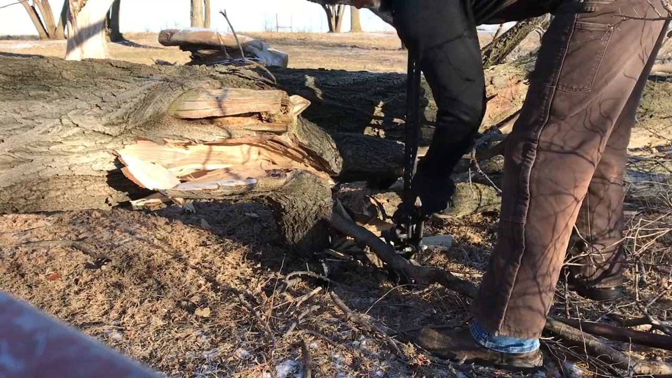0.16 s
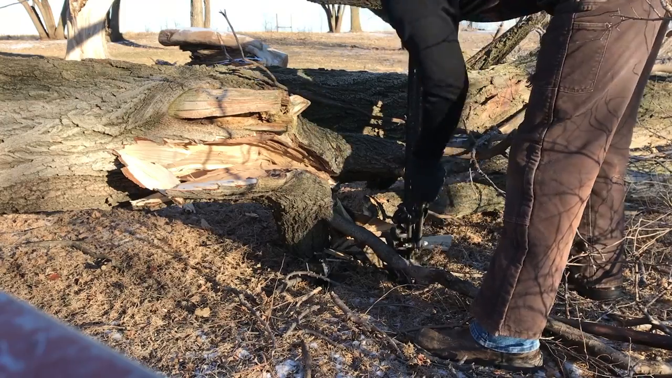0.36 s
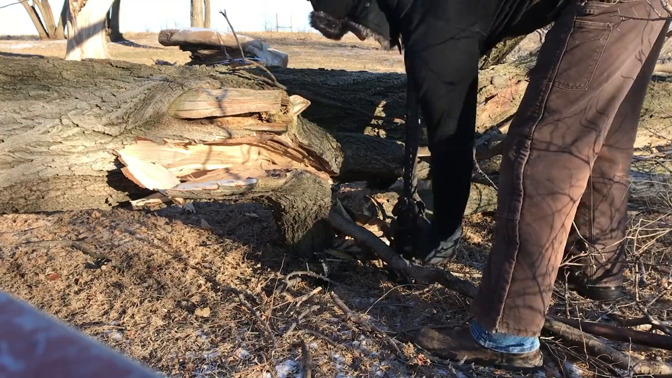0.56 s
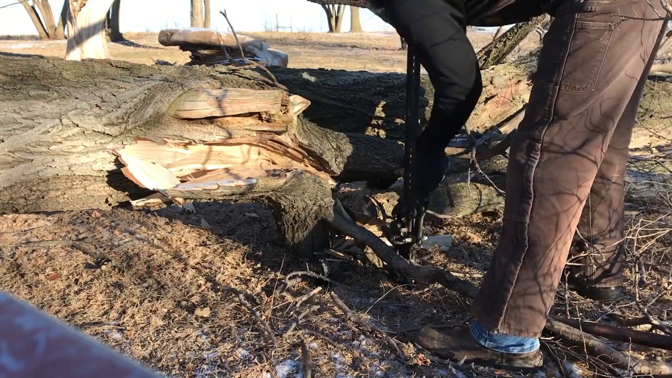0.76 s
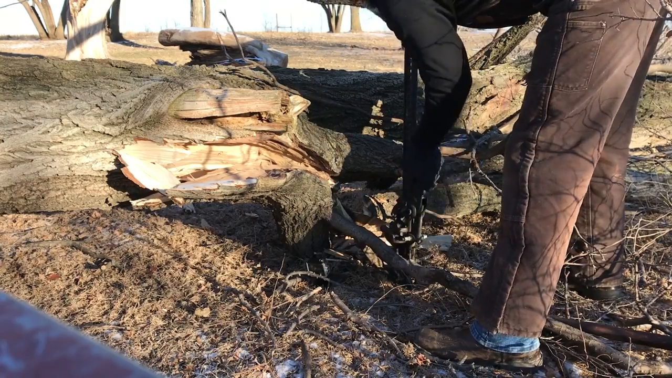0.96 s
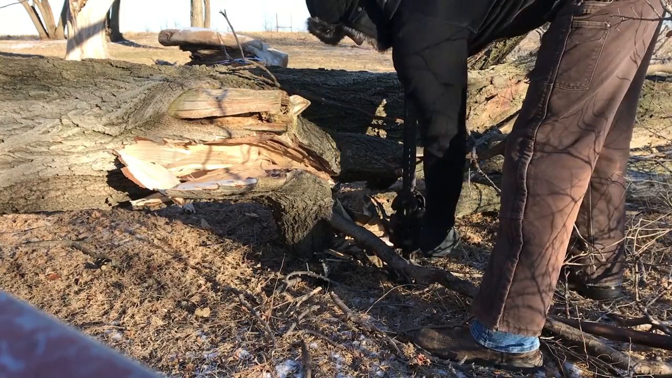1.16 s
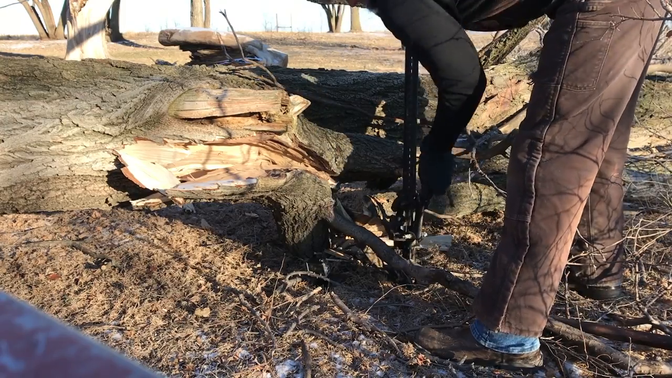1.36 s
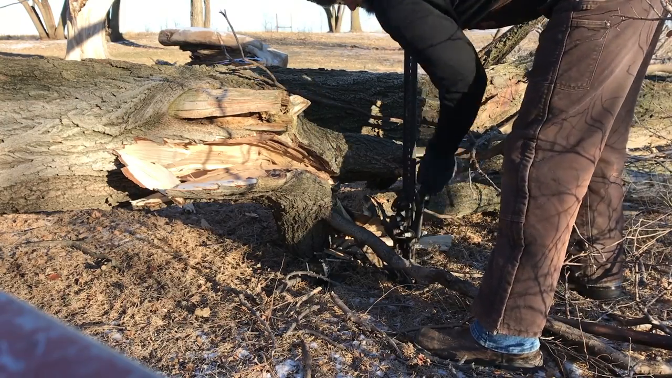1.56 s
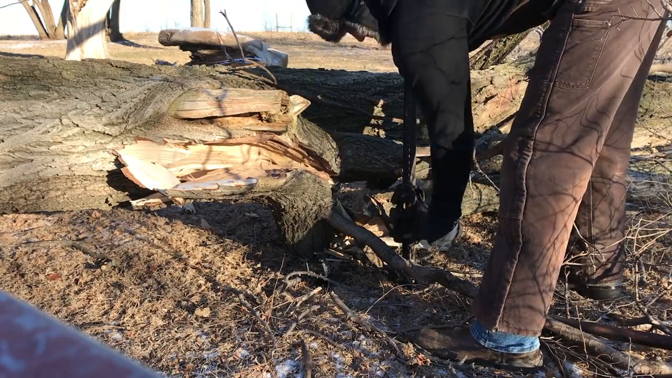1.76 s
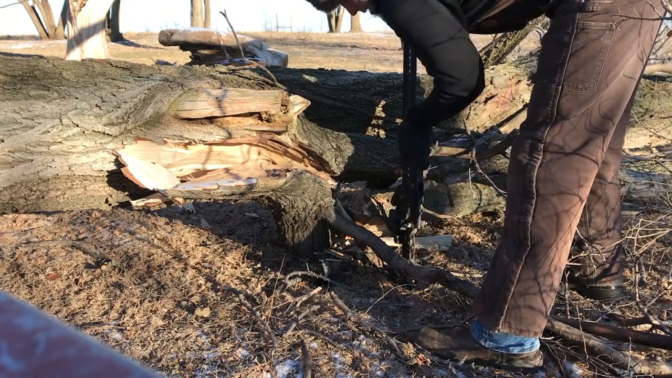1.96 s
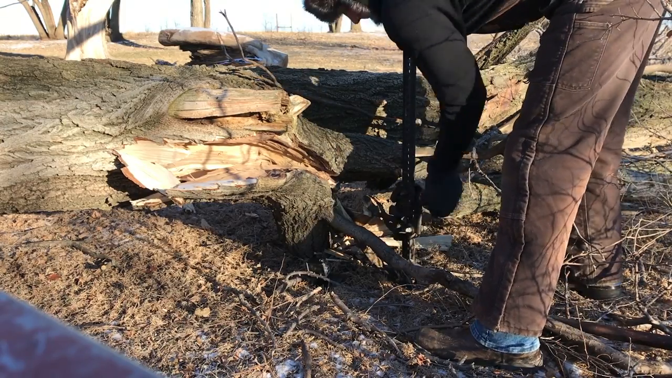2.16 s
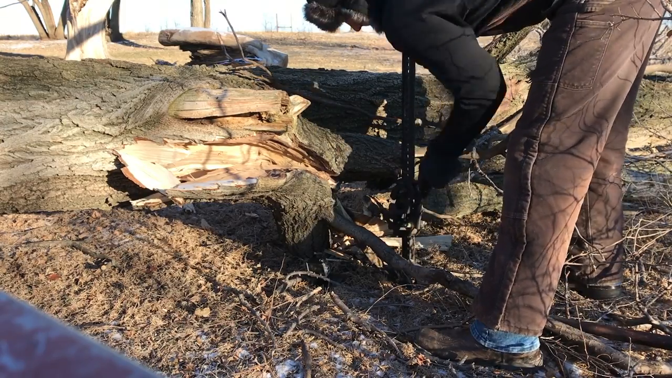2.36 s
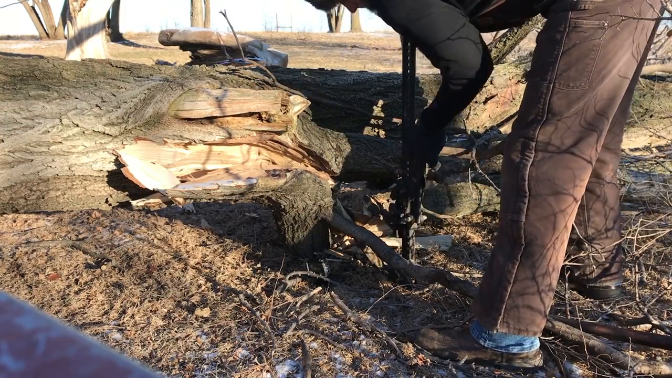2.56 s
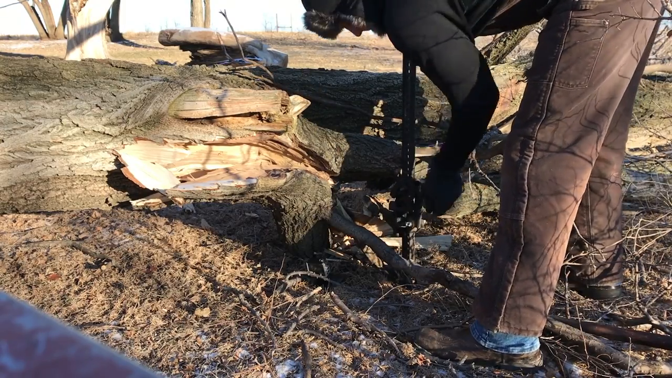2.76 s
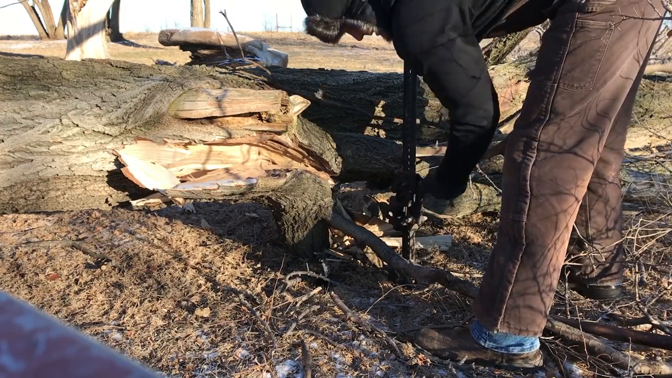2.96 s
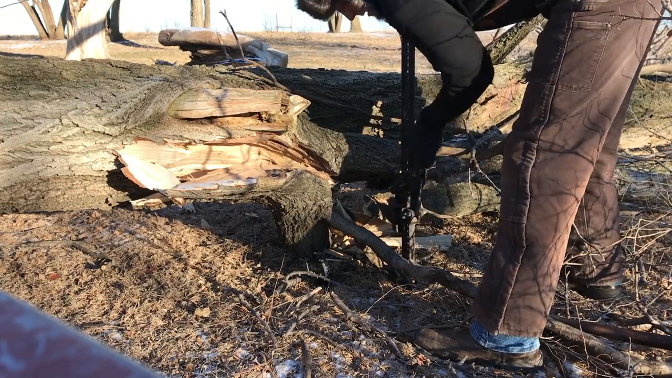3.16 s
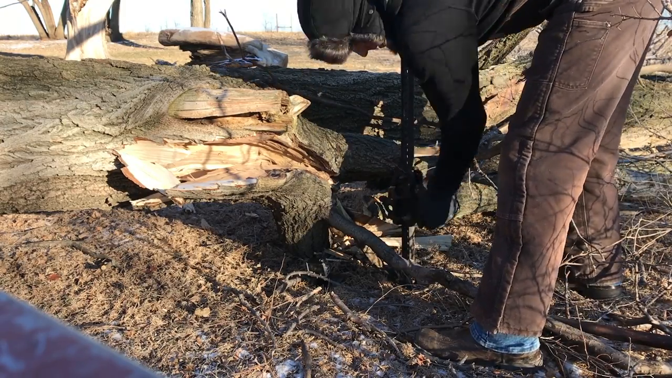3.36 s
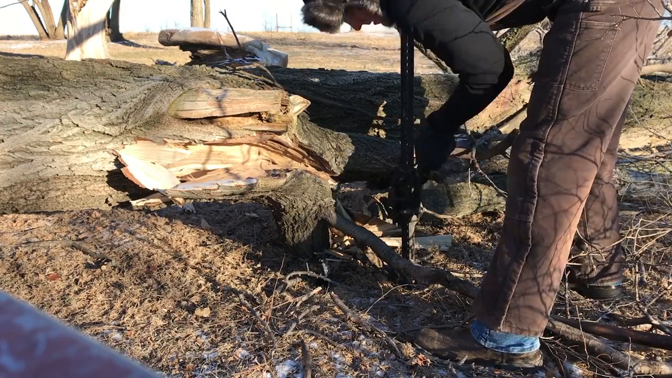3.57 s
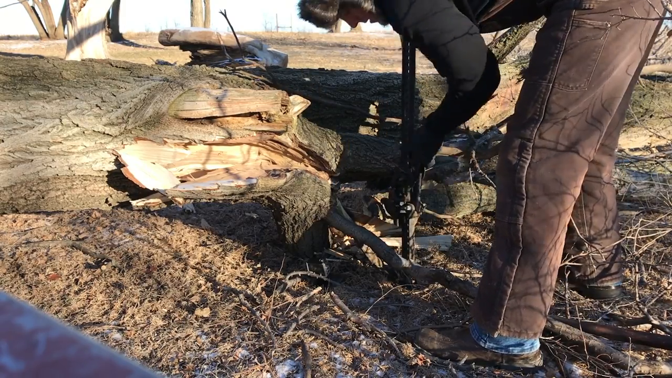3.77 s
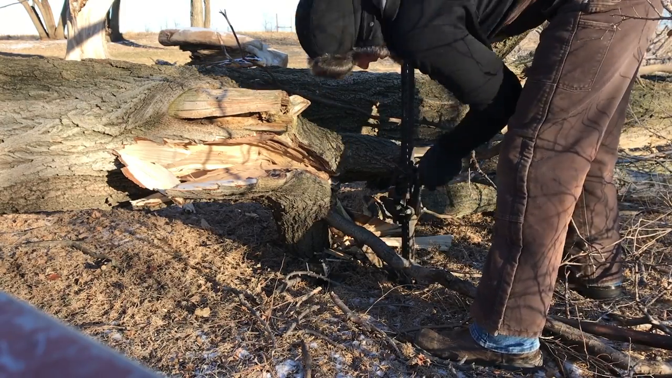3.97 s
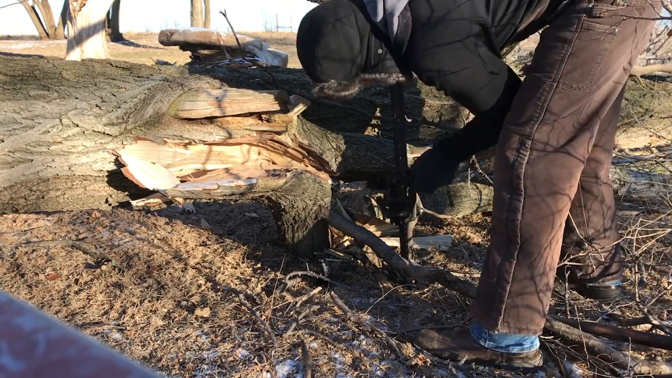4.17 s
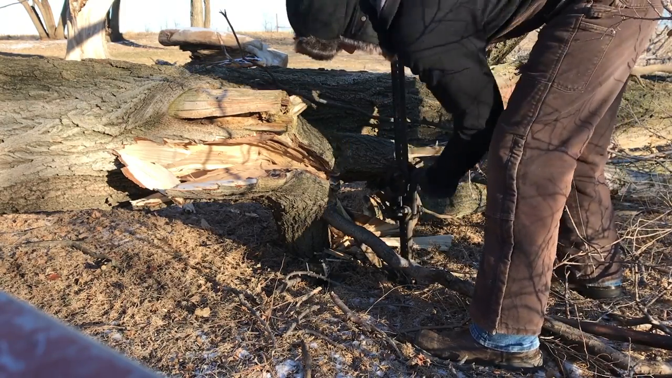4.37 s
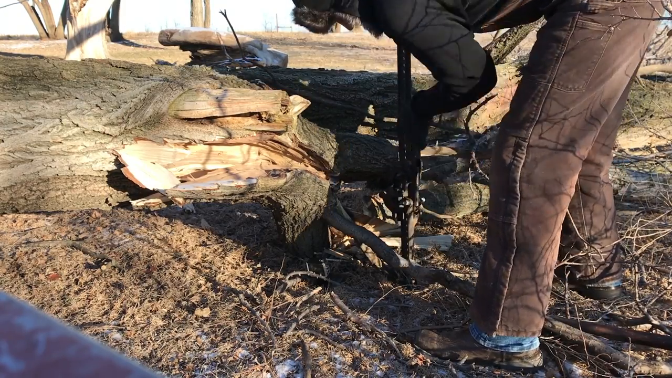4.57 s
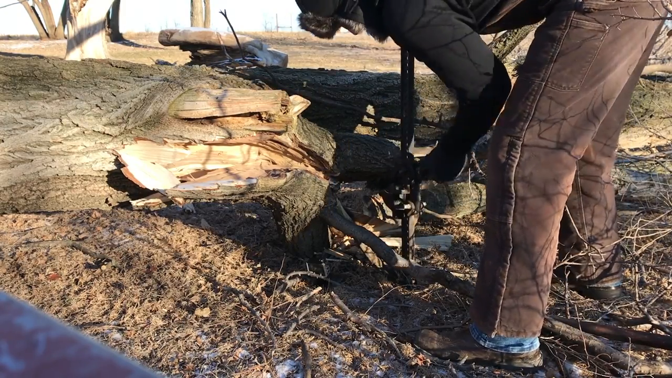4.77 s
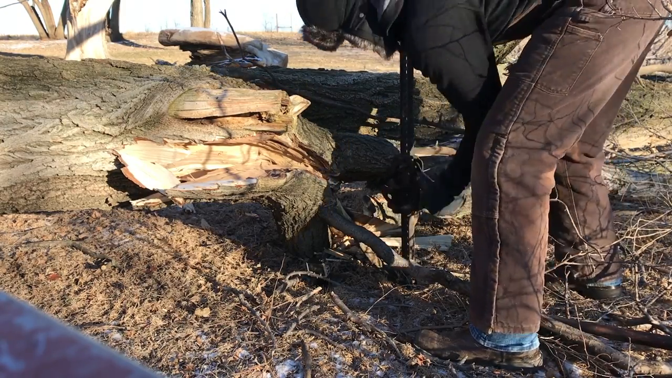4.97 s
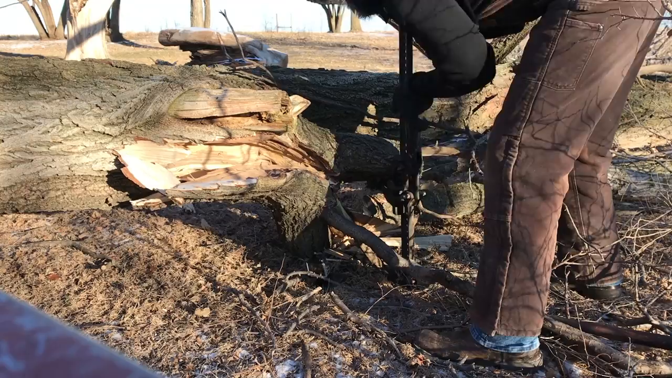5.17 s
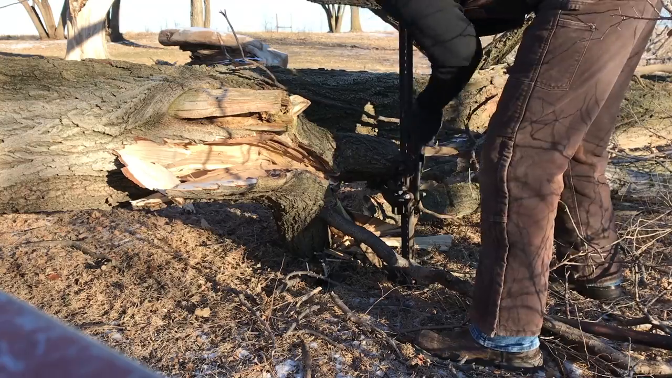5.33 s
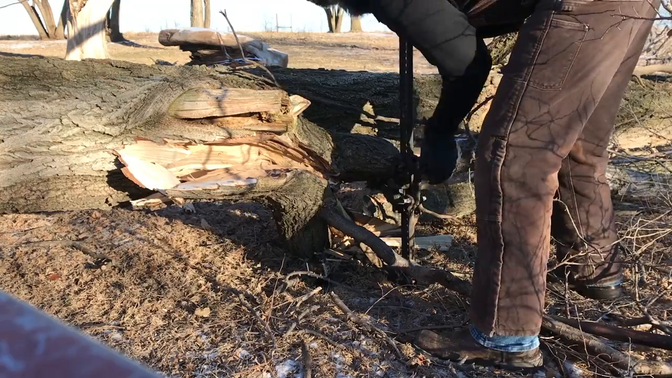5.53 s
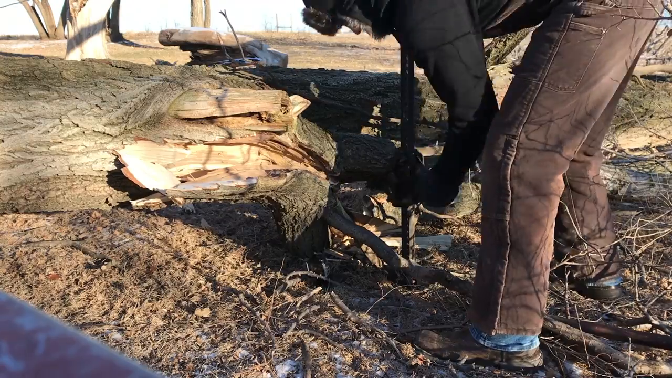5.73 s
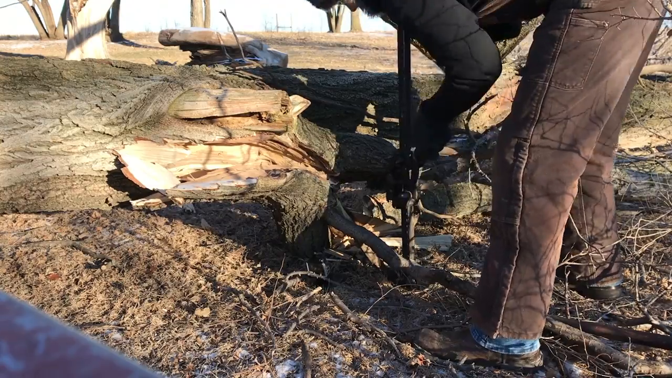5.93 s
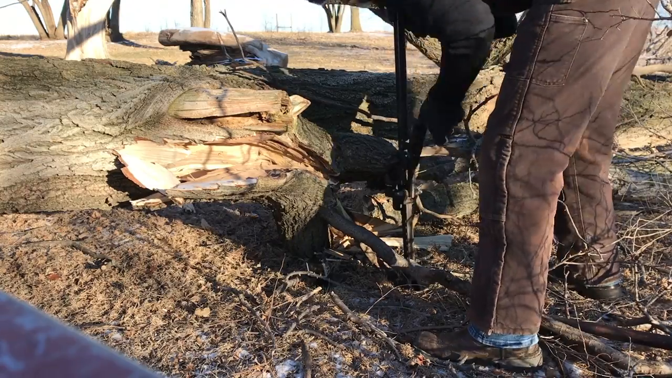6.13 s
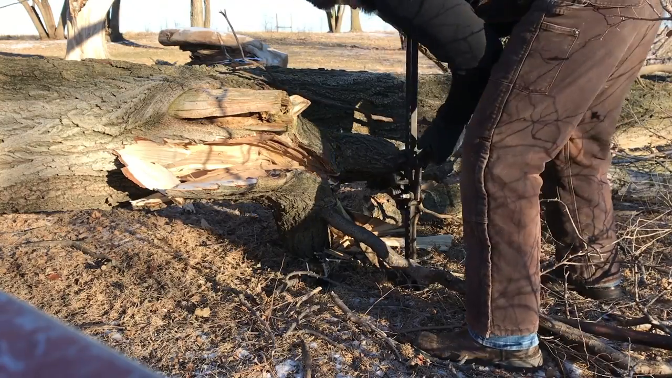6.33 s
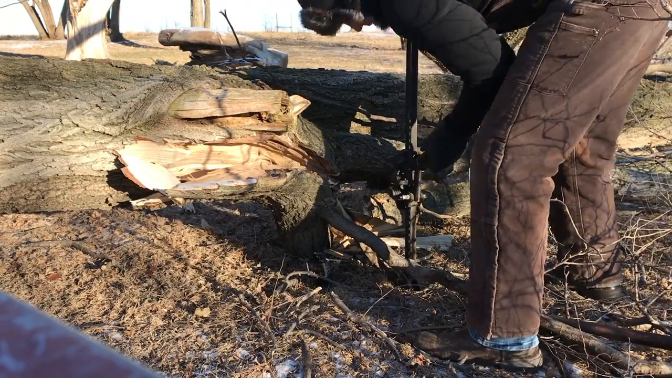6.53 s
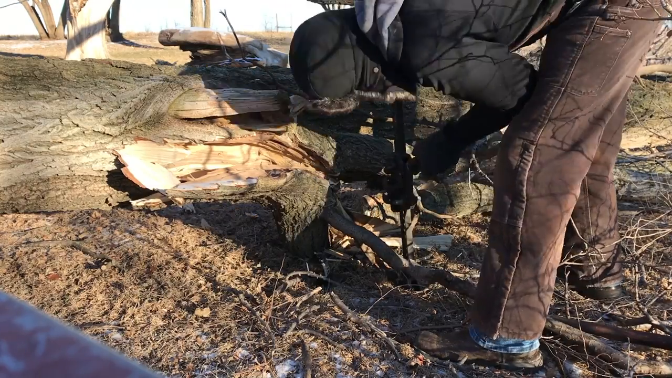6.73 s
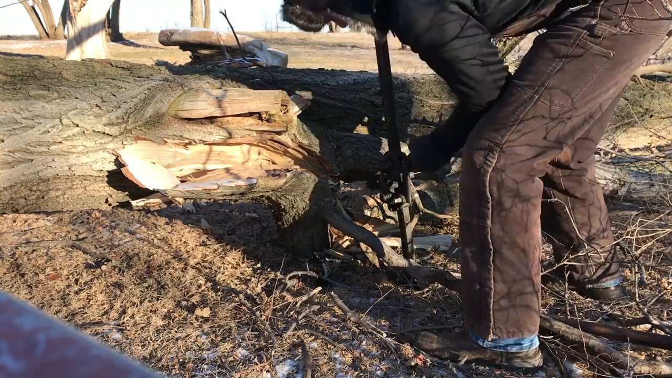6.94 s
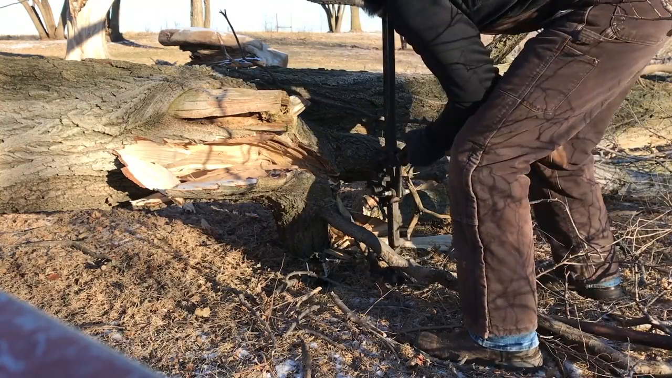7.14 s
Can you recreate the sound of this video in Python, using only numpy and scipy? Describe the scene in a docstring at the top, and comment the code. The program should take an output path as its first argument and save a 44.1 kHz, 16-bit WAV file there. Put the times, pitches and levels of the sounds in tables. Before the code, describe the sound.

Outdoors among trees, sharp steel clicks and clacks come from a nearby jack being worked by hand, several a second, often doubled by small rebounds. The carriage rasps lightly along the bar between blows. Near the end the blows stop for almost a second, leaving faint sliding, before one more scrape and a short cluster of clacks. A far engine hums very softly under the quiet open air.

```python
"""A steel lifting jack is pumped by hand beside a felled trunk; a far engine hums under the woodland hush.
From the start, pins and handle strike and rebound on the bar, exciting damped modes that the ground
and trees scatter back; between blows the carriage slides and scrapes by friction. Around 1.2 s the
undamped bar rings on faintly. After 6.3 s the blows pause and the sliding goes on, until a last
scrape and cluster of clacks come just after 7 s."""
import sys
import numpy as np
from scipy import signal
from scipy.fft import rfft, irfft
from scipy.io import wavfile
from scipy.ndimage import uniform_filter1d

SR = 44100
rng = np.random.default_rng(int(sys.argv[2]) if len(sys.argv) > 2 else 0)


def pcm_store(signal):
    """Save signal as 16-bit PCM."""
    levels = np.round(np.clip(np.atleast_2d(signal), -1, 1) * 32767)
    wavfile.write(sys.argv[1], SR, levels.astype(np.int16).T)


N = 317520

# spectra of the woodland air, the rubbing, and a faint high hiss that swells and drops out between blows: f/Hz,
# relative density/dB
HUSH_SPECTRUM = [(18, -50), (30, -24.5), (54, -17), (86, -10), (112, -4), (185, -5.5), (450, -23.5),
                 (800, -26.5), (1700, -26), (3000, -32.5), (4600, -39.5), (6700, -41), (9000, -57),
                 (16500, -68.5)]
RUB_SPECTRUM = [(800, -29.5), (1500, -8.5), (2300, 0.5), (3300, -3), (4600, -9), (6800, 5.5), (8200, -4),
                (10000, -28.5), (16000, -38)]
HISS_SPECTRUM = [(5000, -34), (8500, -6), (11000, -4), (16000, -9)]
# engine tones: f/Hz, bandwidth/Hz, level/dB
ENGINE_TONES = [(127.6, 6.8, -65), (181.9, 7.4, -63), (574, 5.2, -80.5)]
# steady sliding of steel on steel, and the faint high hiss: t/s, rub level/dB, hiss level/dB
SLIDING = [(0.0, -61, -76), (.2, -73, -84), (.45, -63, -77), (.75, -66, -75), (0.999, -72, -92),
           (1.3, -80, -88), (1.5, -65, -78.5), (2.1, -65.5, -79.5), (2.9, -69, -80.5), (3.35, -64.5, -74),
           (3.85, -68, -78), (4.11, -73, -87), (4.5, -67, -81), (5.301, -65, -75), (5.699, -71.5, -86),
           (6.001, -80, -85), (6.4, -69.5, -86), (6.8, -69, -82.5), (7.2, -69, -80.5)]
# harder rubs: peak t/s, level/dB, swell time/s
SCRAPE_PEAKS = [(.58, -84, 0.043), (1.24, -63, 0.23), (2.36, -61.5, 0.12), (2.65, -62.5, 0.09),
                (3.78, -60, .06), (4.73, -68.5, 0.053), (5.29, -65.5, 0.084), (5.86, -58.5, 0.076),
                (6.015, -58, 0.016), (6.045, -53.5, 0.028), (6.09, -59.5, 0.13), (6.19, -62, 0.027),
                (7.142, -52, 0.082)]
# scattered tail: f/Hz, level/dB, T60/s
SCATTER_DECAY = [(1000, -37, 0.2), (2300, -57.5, 0.075), (4500, -58.5, 0.31), (6570, -59, .16),
                 (12000, -49, 0.057)]
# modes of the jack: f/Hz, level/dB, T60/s
BAR_MODES = [(1990, -5, .25), (2060, -2, .4), (2570, 2, .5), (2827, -5.5, .25), (3120, -4, 0.3),
             (3620, -8, .4)]  # long ring of the tall bar
THUD_MODES = [(253, 5, 0.039), (447, -1.5, 0.071), (603, -5, 0.049), (875, 2, 0.022), (1060, -5.5, 0.011)]  # base plate on soil
KNOCK_MODES = [(747, -3, 0.034), (1196, 1, 0.011), (1365, 1.5, 0.019)]  # heavy carriage rocking
BODY_MODES = [(1823, -8.5, 0.029), (2000, -6, 0.038), (2154, 2.5, 0.019), (2482, -4.5, 0.015),
              (2888, -1.5, 0.011), (3154, -13, 0.033), (3385, -2.5, 0.0082), (3670, -18, 0.042),
              (3920, 2, 0.0055)]  # bar and carriage
SNAP_MODES = [(2270, -1, 0.0026), (2880, 0, 0.0036), (4060, -1.5, 0.0023), (5200, -8, 0.0035)]  # dry snap of steel on steel
CLACK_MODES = [(4700, -2, 0.0089), (4750, -3, 0.015), (5370, -7, 0.018), (5728, -1, 0.0073),
               (6110, -3, 0.015), (6443, -3, 0.0065), (6847, 0.5, 0.011), (7330, -11, 0.017),
               (7405, 0, 0.01), (7860, -8.5, 0.024), (8344, -4, 0.0085), (9070, -1.5, 0.0082)]
TREBLE_MODES = [(9820, 7.5, 0.0083), (10780, 5.5, 0.011), (10700, -2, 0.0035), (12300, 1, 0.0036),
                (13370, -8.5, .005), (14200, -16.5, .005), (15460, -13, .006)]
PIN_MODES = [(6710, 0, .045)]
# blows that set a free pin singing, and blows that rock the carriage: t/s, energy level/dB in 1 ms
PIN_BLOWS = [(.3537, -19), (.5016, -17.5), (1.5158, -6), (2.0534, -6), (2.439, -25), (2.5883, -33),
             (3.964, -23), (4.474, -17), (5.234, -47), (7.1802, -36.5)]
KNOCK_BLOWS = [(.3537, -41.5), (.5016, -46), (1.5158, -47), (4.6214, -43.5), (5.2466, -46), (7.1739, -37)]
# blows of a pin or the handle: t/s, clack energy level/dB in 1 ms, body level/dB re clack,
# treble level/dB re clack, thud energy level/dB in 1 ms, chatter time/ms
IMPACTS = [(.0031,-16.5,-16,-20,-59.5,0.65),(.032,-17,-13.5,-50,-47,1.9),(0.0813,-53,12,-14,-74,3.2),(.087,-29.5,-4,-24,-70,2.6),
           (.131,-32.5,-13,-28,-70,0.92),(.1335,-40,-7,-17,-70,1.7),(0.1489,-28,1.5,-17,-70,0.66),(0.1527,-19.5,-12.5,-12,-72,.8),(0.1609,-32,-12,-23,-72,2.7),
           (0.2083,-46,10,-26,-70,4.9),(0.35,-48,9,-8,-74,8.6),(.3537,-11.5,-5.5,-25,-69,2.8),(0.41,-42,-22,-13,-67,1.5),(.4175,-39,-15,-14,-74,1.7),
           (.422,-40,.5,-22,-72,6.1),(0.431,-40,-2,-26,-70,1.2),(0.472,-29,-14,-17,-70,3.2),(0.493,-47,3,-14,-70,11),(0.5018,-14,-6.5,-22,-52,0.99),
           (.526,-54.5,10,-20,-70,1.8),(.5825,-58.5,8,-18,-69,1.2),(.6157,-16,-16,-8.5,-68,1.3),(.6412,-21,-7,-25,-45,2.6),(0.6571,-22,-6,-28,-75,2.1),(0.6876,-35.5,9,-28,-68,2.2),
           (.692,-22.5,-4.5,-23,-68,3.3),(.7345,-60,13,-19,-70,1.5),(.7505,-42,8,-32,-70,0.51),(0.754,-39,4,-21,-64,2.2),(.758,-28.5,1.5,-23,-60,5.6),
           (.7672,-53,13,-19,-70,3.8),(0.7847,-32.5,10,-30,-50,2.8),(0.8638,-54.5,6.5,-27,-68,2.3),(0.8955,-27,-4,-31,-44,1.2),(0.9066,-26,-6.5,-14,-62,1.2),(1.031,-60,4,-11,-69,3.8),(1.0497,-52,6,-19,-58,3.3),
           (1.0605,-26.5,-1.5,-46,-62,2.6),(1.1032,-33.5,-5,-14,-70,5.6),(1.1121,-21,-1.5,-26,-41,2.6),(1.125,-35.5,-9,-21,-70,2.9),
           (1.2052,-14.5,-11.5,-15,-70,1.8),(1.2231,-14.5,-10,-29,-43.5,3.1),(1.2364,-20,-4.5,-31,-61,2.2),(1.2791,-18.5,-0.5,-20,-68,3.6),
           (1.3383,-34,4,-39,-76,0.72),(1.3436,-36.5,7,-32,-70,3.1),(1.3527,-16,-2.5,-32,-41.5,3.4),(1.3782,-30.5,8.5,-19,-54,0.57),(1.3835,-43,11,-23,-70,0.89),
           (1.4145,-62,20.5,-22,-70,2.6),(1.5112,-37,-3,-14,-63,2.9),(1.5159,-8.5,-5.5,-14.5,-70,3.95),(1.582,-63,12,-14,-70,1.7),(1.6007,-44,-2,-15,-68,2.6),(1.6513,-38,7.5,-41,-46,3.1),
           (1.664,-32.5,-1,-26,-42,2.6),(1.67,-33,-4,-15,-61,3.7),(1.6777,-17,-2.5,-24,-45,3.9),(1.686,-32,-8,-19,-38.5,2.5),(1.705,-50,11,-22,-50,3.4),
           (1.7707,-12.5,-15,-14.5,-68,0.73),(1.789,-11.5,-13,-41,-45,1.3),(1.8028,-22,-2,-28,-61,2.1),(1.8511,-22,0.5,-17,-43,2.7),
           (1.9147,-30,1.5,-40,-67,0.37),(1.919,-28,.5,-25,-63,3.5),(1.9242,-22,-7.5,-18.5,-41,1.3),(1.927,-34,0,-20,-74,12),(1.9435,-31,8,-23,-50,1.8),
           (2.023,-52.5,9,-16.5,-66,13),(2.0529,-8,-6.5,-25.5,-63,6.2),(2.0727,-41,-5,-13.5,-65,3.1),(2.132,-49.5,-1,-12.5,-72,0.95),(2.1848,-55,11,-14,-76,2.5),(2.196,-31.5,1.5,-30,-73,1.4),
           (2.2047,-25.5,-4.5,-16,-44,9.5),(2.2132,-19,-3.5,-29,-42,3.1),(2.221,-31.5,-6,-19,-67,4),(2.2363,-54.5,7.5,-14,-70,1.7),(2.263,-47.5,-15.5,-15,-70,1.6),(2.2958,-38,-16,-20,-73,2),(2.3017,-15,-15.5,-14,-70,0.4),
           (2.3185,-11.5,-10.5,-41,-46,1.52),(2.334,-26,3.5,-37,-54,2.4),(2.411,-32,-35,-13,-63,0.84),(2.428,-39,11,-17,-61,7.9),(2.4347,-23.5,-7,-20,-61,1.4),
           (2.439,-12.5,-12,-21,-42.5,1.9),(2.4518,-45.5,18,-22,-70,0.84),(2.5885,-7,-10.5,-31.5,-39.5,4.9),(2.622,-61,6,-14,-70,3),(2.641,-53,7,-14,-70,3.5),(2.671,-62,4,-10,-70,1.7),(2.6858,-53,12,-14,-56.5,3.6),(2.704,-50.5,5,-26,-65,14),
           (2.7573,-33,2,-25,-64,3.2),(2.7631,-23.5,-3,-24,-48,4),(2.7664,-26,3,-43,-44,4.4),(2.781,-37,-16,-18,-59,2),(2.8423,-68.5,16,-10,-63,2.3),(2.9249,-14,-18.5,-15.5,-66,1.2),
           (2.9446,-13,-10,-37,-43.5,0.7),(3.0548,-26.5,2,-31,-64.5,4),(3.0579,-26.5,-6,-25,-63,6.8),(3.0742,-15.5,-7.5,-21,-44,0.53),(3.087,-43.5,13,-22,-42,1.6),
           (3.1755,-53,5,-16,-70,1.3),(3.1927,-6,-13,-25.5,-60,3.7),(3.2143,-39,-12,-18.5,-45.5,5.2),(3.2852,-52.5,11,-18,-70,3.2),(3.299,-44,8,-28,-70,4.2),(3.316,-18.5,-3.5,-34,-52.5,3.3),
           (3.3303,-42,1,-25,-42,2.2),(3.3642,-43,-7,-26,-70,1.6),(3.4082,-15.5,-15.5,-9.5,-78,2.4),(3.4344,-12,-11,-47,-38.5,2.3),(3.503,-51.5,9.5,-26,-74,0.92),
           (3.532,-47.5,-12.5,-14,-70,2.2),(3.5456,-39,-9,-16,-59,2.5),(3.554,-24.5,1.5,-38,-53,5.7),(3.5608,-21,-18,-29.5,-42,4.3),(3.5733,-37.5,17.5,-20,-39.5,4.1),(3.723,-41,-6,-24.5,-73,21),
           (3.7358,-5.5,-12,-23,-43,5.3),(3.885,-50.5,10.5,-27,-72.5,2),(3.9337,-38,-3,-17,-50.5,3.7),(3.945,-52,-5,-6,-49,4.9),(3.9526,-31.5,-1.5,-30,-71.5,2),
           (3.9574,-26.5,-7,-24.5,-67.5,2.6),(3.965,-25.5,3,-31,-60,2.1),(3.9745,-33,-3,-30,-54.5,1.6),(3.9811,-31.5,-0.5,-39,-41,1.47),(4.1325,-63.5,11.5,-16.5,-71.5,2.5),(4.1738,-60.5,-11.5,-28.5,-70.5,1.5),(4.311,-45,-3.5,-22,-71.5,10.6),
           (4.3311,-13.5,-15.5,-12.5,-67,1.13),(4.3505,-13.5,-12.5,-56,-50,1.25),(4.3698,-32,-8,-22,-67,.9),(4.3763,-37,-6,-19,-68,1.5),(4.3883,-34.5,-2,-17,-68,2.2),
           (4.3932,-44,5.5,-23,-64,4.5),(4.411,-48,-3,-11,-70,2),(4.4637,-24.5,-1,-23,-57,6.5),(4.475,-21.5,0,-24,-41,2.5),(4.5226,-71.5,28.5,-12,-63,2),(4.6209,-9.5,-8,-24,-59,3.5),
           (4.6717,-44.5,-5,-11,-67,1.5),(4.7588,-18.5,-1.5,-22,-58,6.1),(4.9246,-47.5,-16,-15.5,-58,2.2),(4.9645,-10.5,-27,-14,-70,0.85),(4.9783,-10,-11,-37,-41.5,2),
           (4.9897,-25,-2.5,-18,-47,2.4),(5.0874,-42,-7,-4,-70,3.6),(5.109,-32,-0.5,-35,-74,3.3),(5.116,-33,6,-20,-70,3.6),(5.126,-15.5,-11.5,-41,-40.5,1.6),
           (5.182,-59.5,12,-15,-70,1.4),(5.2072,-48,-15.5,-14,-70,2.4),(5.234,-46,2,-10,-54,10),(5.2469,-6.5,-6,-13.5,-39,5.7),(5.3,-46,-3,-27,-69.5,2),(5.3742,-68,23,-22,-47,1.8),(5.471,-57.5,3,-14,-72,3.4),(5.4887,-32,0,-18,-68,1.5),
           (5.4978,-20,-3,-18.5,-35,4.6),(5.6868,-44.5,-10.5,-11.5,-66.5,2.0),(5.6948,-48,-10,-20.5,-70,11.5),(5.7175,-16.5,-16,-5,-53,0.7),(5.732,-8,-15,-39,-47,0.57),
           (5.7361,-23.5,-0.5,-22.5,-39.5,2.2),(5.8381,-42,-9,-21,-70,0.95),(5.8413,-35,-15,-12,-49,2),(5.846,-42,6.5,-15,-70,6.1),(5.8536,-40,-13,-23,-52,2.5),
           (5.8635,-38,10.5,-23,-52,1.7),(5.868,-27,-5.5,-33,-61,1.4),(5.8843,-15.5,-7.5,-29,-34,2.4),(5.8895,-36,7.5,-21,-51,6.9),(6.046,-42,-4,-13,-44,1.7),
           (6.0616,-46,-16,-18,-70,1.5),(6.099,-57,9,-25,-70,1.3),(6.11,-41.5,-10,-14,-62,1.2),(6.118,-22.5,-2.5,-35,-35.5,3.7),(6.1231,-36,-8,-26,-43,4),(6.14,-59,12,-16,-45.5,4.4),(6.164,-48,-2,-26,-51,10),
           (6.1763,-45.5,8.5,-32,-69,3.1),(6.239,-42,6,-25,-70,2.3),(6.2487,-37,-17,-17,-69,1.3),(6.253,-23.5,-2,-13,-48,0.5),(6.2632,-26,-12.5,-22,-58,1.1),
           (6.306,-55,8,-19,-66.5,2.7),(7.053,-49,-4,-17,-68,3.4),(7.1058,-38.5,-20,-28,-63,0.6),(7.1279,-32,-30,-22,-72,1.8),(7.136,-27,-17,-24,-64,1.5),
           (7.1415,-47,-21,-16,-70,7),(7.1523,-43,-15,-27,-68,1.5),(7.163,-46,-21,-28,-70,1.7),(7.1737,-14.5,-1.5,-20,-37.5,5.2),(7.181,-11.5,-12,-20,-64,2.1)]

PIN_DB, KNOCK_DB, SNAP_DB = -22, -34.5, -6.5  # pin re clack; knock and snap re body
CLACK_HZ, CLACK_HZ_PER_DB, USUAL_TREBLE_DB = 6637, 19.5, -23.5  # bright blows favour higher clack modes
BODY_HZ, BODY_HZ_PER_DB = 2874, -13  # body-heavy blows favour lower body modes


def amp(db):
    """Amplitude ratio: tenfold for every 20 dB."""
    return 10 ** (np.asarray(db) / 20)


def unit_rms(x):
    """Normalisation to unit mean power."""
    return x / np.sqrt(np.mean(x ** 2) + 1e-20)


def filtered(x, gain):
    """Linear filtering: the spectrum is multiplied by gain(f), and the result scaled to unit rms."""
    return unit_rms(irfft(rfft(x) * gain(np.fft.rfftfreq(len(x), 1 / SR)), len(x)))


def shaped(x, spectrum):
    """Spectral shaping by levels interpolated over log frequency, at unit rms."""
    hz, db = np.transpose(spectrum)
    return filtered(x, lambda f: amp(np.interp(np.log(f + 1), np.log(hz + 1), db)))


def highpass(x, hz, order):
    """Attenuation below the cutoff, by 6 dB an octave for each order."""
    return signal.sosfilt(signal.butter(order, hz, "high", fs=SR, output="sos"), x)


def woodland(level_db=-58, drift_db=1.5):
    """Modulated noise: a hush, mostly low rumble, drifts in patches of time and frequency."""
    hush = amp(level_db) * shaped(rng.standard_normal(N), HUSH_SPECTRUM)
    bands = signal.stft(hush, nperseg=512)[2]
    patches = uniform_filter1d(rng.standard_normal(bands.shape), size=12, axis=0)
    patches = unit_rms(uniform_filter1d(patches, size=16, axis=1))
    return signal.istft(bands * amp(drift_db * patches), nperseg=512)[1][:N]


def far_engine():
    """Narrow-band noise: each band is heard as a wavering tone."""
    return sum(amp(db) * filtered(rng.standard_normal(N), lambda f: 1 / (1 + (2 * (f - hz) / width) ** 2))
               for hz, width, db in ENGINE_TONES)


def scattering(jack):
    """Reverberation: ground, trunk and trees return each blow as a faint, exponentially decaying tail."""
    hz, t, bands = signal.stft(rng.standard_normal(SR // 2), SR, nperseg=128)
    f, db, t60 = np.transpose(SCATTER_DECAY)
    level_db = np.interp(hz, f, db)[:, None] - 60 * t / np.interp(hz, f, t60)[:, None]
    tail = signal.istft(bands * amp(level_db), SR, nperseg=128)[1]
    return signal.oaconvolve(jack, tail[64:])[:N]


def rubbing(swell_db=17, release_ratio=.95, scrape_hiss_db=-13):
    """Sliding friction: uneven grit rings the steel, and the level follows the stroke. Alongside, a faint high
    hiss swells and drops out between blows."""
    t = np.arange(N) / SR
    scrape = sum(amp(db - swell_db * np.maximum((at - t) / swell, (t - at) / (release_ratio * swell)))
                 for at, db, swell in SCRAPE_PEAKS)
    sizes = amp(3.2 * np.minimum(rng.exponential(1, N), 6))
    grit = sizes * (rng.random(N) < .03) * rng.choice([-1., 1.], N)
    grit += .6 * rng.standard_normal(N)
    flicker = filtered(rng.standard_normal(N), lambda f: (f > 2) / np.sqrt(f + 1) / (1 + (f / 60) ** 2))
    grit *= amp(.63 * flicker)  # the contact catches
    times, rub_db, hiss_db = np.transpose(SLIDING)
    rub_gain = amp(np.interp(t, times, rub_db)) + scrape
    hiss_gain = amp(np.interp(t, times, hiss_db)) + amp(scrape_hiss_db) * scrape
    return rub_gain * shaped(grit, RUB_SPECTRUM) + hiss_gain * shaped(grit, HISS_SPECTRUM)


def bar_ring(jack, coupling_db=-72.5, freest_s=1.2, width_s=.38):
    """Resonance: blows feed the bar's long modes in the moment when neither hand nor load damps it."""
    hz, db, t60 = np.transpose(BAR_MODES)[:, :, None]
    t = np.arange(SR // 2) / SR
    response = (amp(db - 60 * t / t60) * np.sin(2 * np.pi * hz * t)).sum(axis=0)
    coupling = amp(coupling_db) * np.exp(-.5 * ((np.arange(N) / SR - freest_s) / width_s) ** 2)
    return signal.oaconvolve(jack * coupling, response)[:N]


def loose_ticks(count=22, until_s=6.35, level_db=-64):
    """Random impacts: loose parts tick faintly as the handle is worked; rows as in IMPACTS."""
    return [(when * until_s, level_db + 2 * size - 1, 5.5, -16.5, -90, 2.3)
            for when, size in rng.random((count, 2))]


def blow_levels(usual_db, exceptions):
    """Selective excitation: each exception sets the level of the blow nearest to it in time."""
    times = np.transpose(IMPACTS)[0]
    db = usual_db.copy()
    for at, own_db in exceptions:
        db[np.argmin(abs(times - at))] = own_db
    return db


def ring(modes, force, energy_db, centre_hz=None, log_width=1., detune=.025, cluster=3):
    """Modal superposition: each blow's force drives clusters of damped sines, scaled to its energy."""
    hz, db, t60 = np.transpose(modes * cluster)[:, :, None]
    t = np.arange(min(force.shape[1], round(t60.max() * SR))) / SR
    polarity, offset = rng.standard_normal((len(force), len(hz), 3)).transpose(2, 0, 1)[1:, ..., None]
    neighbour = (np.arange(len(hz)) >= len(modes))[:, None]  # weaker and further detuned
    share = amp(-5 * neighbour) * np.sign(polarity)
    detuned_hz = hz * (1 + detune * offset * np.where(neighbour, 1.3, .4))
    if centre_hz is not None:  # where a blow lands decides which modes it favours
        share *= np.exp(-.5 * (np.log(hz / centre_hz[:, None, None]) / log_width) ** 2)
    response = (share * amp(db - 60 * t / t60) * np.sin(2 * np.pi * detuned_hz * t)).sum(axis=1)
    sound = signal.fftconvolve(force, response, axes=1)[:, :force.shape[1]]
    gain = amp(energy_db) * np.sqrt(SR / 1000) / np.linalg.norm(sound, axis=1)
    return sound * gain[:, None]


def rebound_forces(chatter_ms, samples=2400):
    """Inelastic rebound: tiny impulses swell and die within milliseconds, and loose parts rattle on."""
    ms = np.arange(samples) * 1000 / SR
    progress = ms / np.clip(chatter_ms - .3, .2, 20)[:, None]
    rebounds = rng.standard_normal(progress.shape) * (rng.random(progress.shape) < .25)
    rebounds[:, 0] = 1.0
    contact = rebounds * np.minimum(progress / .43 + .58, 1) * np.exp(-.8 * progress ** 1.5)
    fade = signal.windows.tukey(2 * samples, .4)[samples:]
    rattle = rebounds * np.minimum(progress, 1) * amp(-.6 * ms) * fade
    return contact, rattle


def soil_thud(contact, energy_db):
    """A smoothed force excites low modes: base plate and soil feel only a soft shove."""
    shove = uniform_filter1d(abs(contact), size=21, origin=10)
    centre_hz = np.full(len(contact), 480.)
    thud = ring(THUD_MODES, shove, energy_db, centre_hz, log_width=.74, detune=.13, cluster=2)
    return highpass(thud, hz=200, order=2)


def jack_blows():
    """Impact excitation: each blow of pin or handle sets every part of the jack in free vibration."""
    times, clack_db, body_re_clack, treble_re_clack, thud_db, chatter_ms = np.transpose(
        list(IMPACTS) + loose_ticks())
    body_db = clack_db + body_re_clack
    clack_hz = CLACK_HZ + CLACK_HZ_PER_DB * (treble_re_clack - USUAL_TREBLE_DB)
    body_hz = BODY_HZ + BODY_HZ_PER_DB * body_re_clack
    contact, rattle = rebound_forces(chatter_ms)
    steel = ring(CLACK_MODES, contact, clack_db, clack_hz, log_width=.18)
    steel += ring(BODY_MODES, contact, body_db, body_hz, log_width=.27, detune=.013)
    steel += ring(TREBLE_MODES, contact, clack_db + treble_re_clack)
    steel += ring(PIN_MODES, contact, blow_levels(clack_db + PIN_DB, PIN_BLOWS), detune=0, cluster=1)
    steel += ring(CLACK_MODES, rattle, clack_db - 26.5, detune=.022)
    steel += ring(BODY_MODES, rattle, body_db - 20, detune=.15)
    steel += ring(SNAP_MODES, contact, body_db + SNAP_DB, detune=.057, cluster=1)
    steel = highpass(steel, hz=1500, order=3)  # thin steel radiates no bass
    steel += ring(KNOCK_MODES, contact, blow_levels(body_db + KNOCK_DB, KNOCK_BLOWS), detune=.064)
    out = np.zeros(N + contact.shape[1])
    for start, blow in zip(np.round(times * SR).astype(int), steel + soil_thud(contact, thud_db)):
        out[start:start + len(blow)] += blow
    return out[:N]


def scene():
    """Superposition: the jack, its scattered tail and the surroundings add in one channel."""
    jack = jack_blows()
    return (jack + bar_ring(jack) + scattering(jack) + rubbing() + woodland() + far_engine())[None]


def record(dry, ceiling=.65, edge_hz=16100):
    """Saturation and band limiting: peaks are rounded; a small microphone drops deep bass and top treble."""
    rounded = ceiling * np.tanh(dry / ceiling)
    lowpass = signal.firwin(151, edge_hz, window=("kaiser", 8), fs=SR)
    return signal.oaconvolve(highpass(rounded, hz=45, order=2), lowpass[None], "same")


dry = scene()
out = record(dry)
pcm_store(out)
```